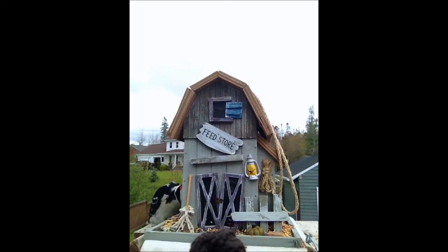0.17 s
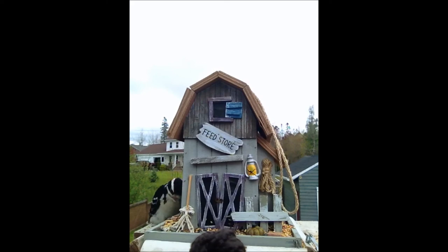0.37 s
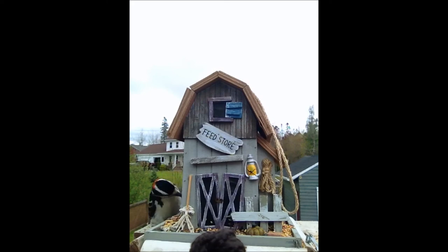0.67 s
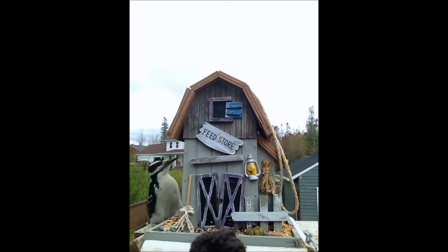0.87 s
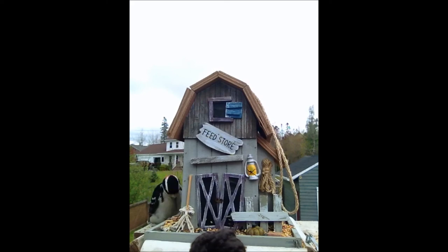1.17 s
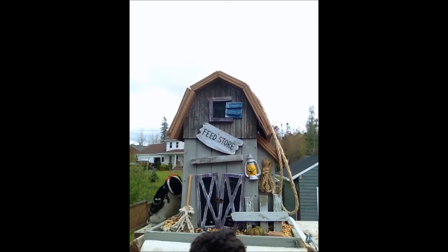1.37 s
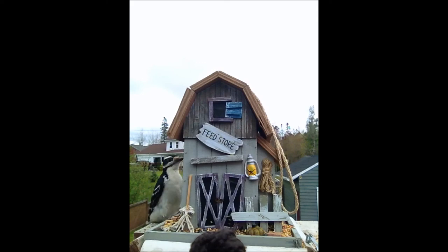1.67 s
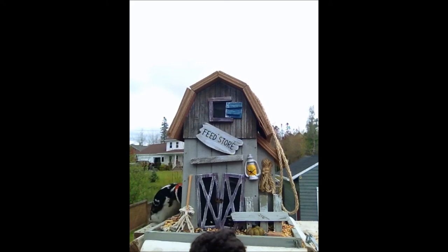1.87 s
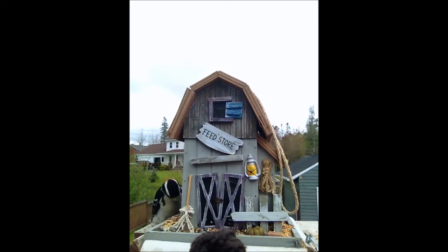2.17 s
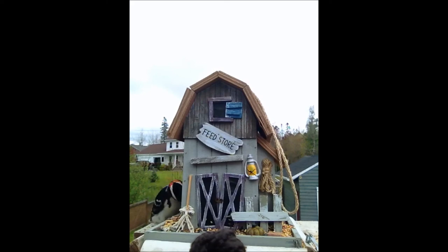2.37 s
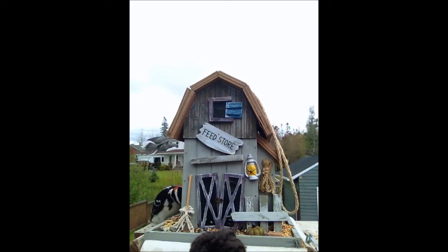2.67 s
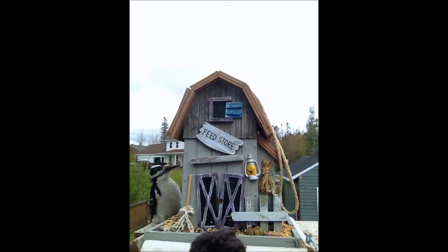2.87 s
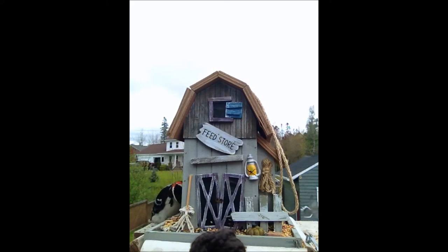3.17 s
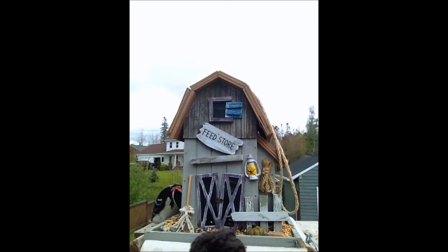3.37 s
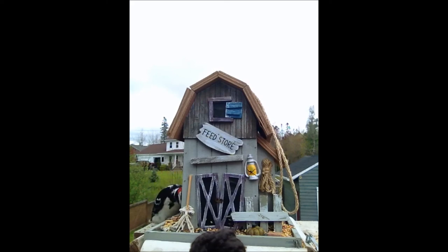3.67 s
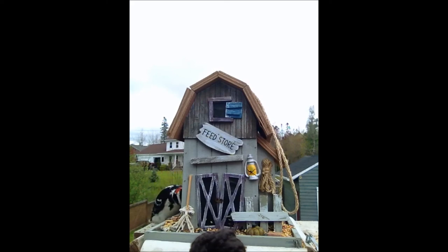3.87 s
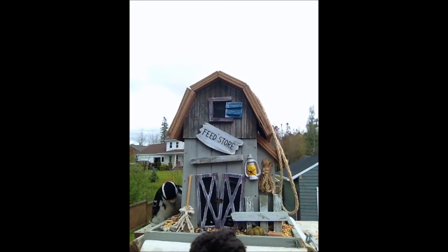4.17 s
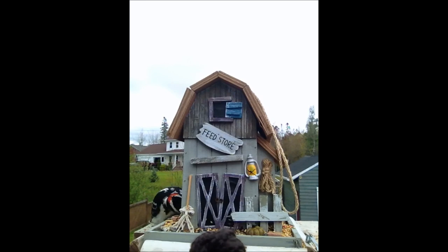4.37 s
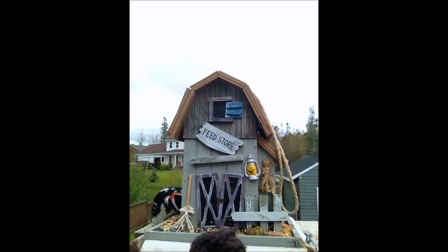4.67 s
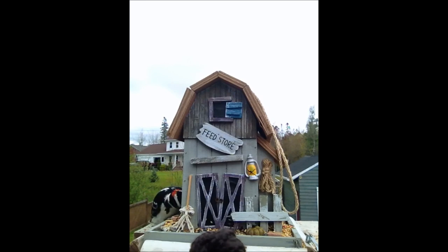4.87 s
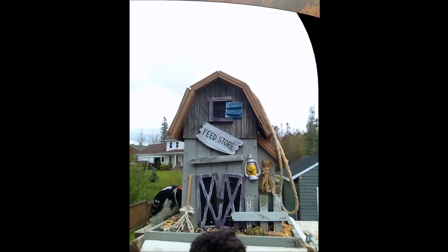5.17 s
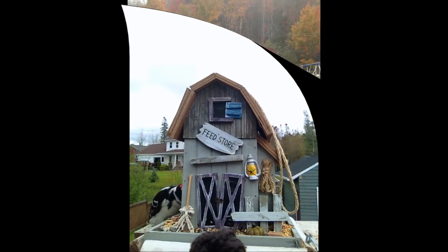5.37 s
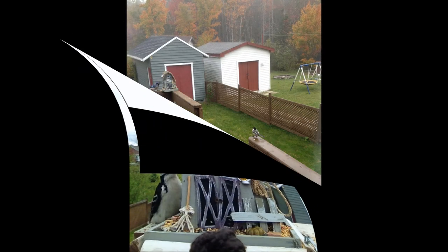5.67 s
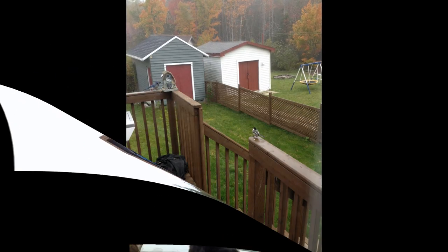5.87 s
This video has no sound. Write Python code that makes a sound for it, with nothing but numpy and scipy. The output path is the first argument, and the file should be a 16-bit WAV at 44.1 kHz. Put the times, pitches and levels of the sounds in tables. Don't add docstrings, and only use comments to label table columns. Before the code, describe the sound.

In an open backyard, close to the microphone, doves take off after a brief quiet hiss. Quick, breathy flaps carry short, reedy wing whistles, strongest around one second, then pass by and thin out. A woodpecker's five crisp pecks crack on shell and wood during the last flaps and just after. Faint far wing whistles and tiny seed ticks remain over soft, steady traffic noise.

```python
import sys
import numpy as np
from scipy import signal
from scipy.fft import rfft, irfft
from scipy.io import wavfile
from scipy.ndimage import uniform_filter1d

SR = 44100
rng = np.random.default_rng(int(sys.argv[2]) if len(sys.argv) > 2 else 0)


def digitize_waveform(pressure):
    field = np.atleast_2d(pressure).T
    bounded = np.clip(field, -1, 1)
    quanta = np.round(bounded * 32767).astype(np.int16)
    wavfile.write(sys.argv[1], SR, quanta)


def voltage_ratio(level):
    return 10 ** (np.asarray(level, float) / 20)


N = 266319


def evened(x):
    return x / np.sqrt(np.mean(x ** 2) + 1e-20)


def read(points, hz):
    f, value = np.transpose(points)
    return np.interp(np.log(hz + 1), np.log(f + 1), value)


def add(mix, s, sound):
    part = mix[round(s * SR):][:len(sound)]
    part += sound[:len(part)]


def coloured(x, points):
    log_gain = np.log(voltage_ratio(read(points, abs(np.fft.fftfreq(4096, 1 / SR)))))
    taps = np.fft.ifft(np.exp(np.conj(signal.hilbert(log_gain)))).real[:2048]
    return signal.oaconvolve(x, taps)[:len(x)]


def ring(modes, detune):
    t = np.arange(4096) / SR
    out = 0
    for (hz, db, t60_s), d in zip(modes, detune):
        out = out + voltage_ratio(db - 60 * t / t60_s) * np.sin(2 * np.pi * hz * d * t)
    return out


def wander(length, size):
    once = uniform_filter1d(rng.standard_normal(length), size)
    return evened(uniform_filter1d(once, size))


OVERTONES_DB = [2, 3.5, 6, -1.5, -4.5, -5, -3]


def whistle(db, length_s, top_hz, end_hz, far_wing):
    u = np.arange(round(length_s * 1.2 * SR)) / (length_s * SR)
    rough = np.clip(1 - far_wing, .032, 1)
    hz = top_hz - (top_hz - end_hz) * np.clip((u - .25) / 0.726, 0, 2) ** 1.48
    arch = np.clip((db + 52) / 110 * length_s / .03, .02, .2)
    hz *= 1 - arch * (np.exp(-u / .12) + .25 * u ** 8)
    far_wing_db = min(-11 + 120 * rough, -3)
    out = 0
    for ratio, wing_db in ((1, 0), (far_wing, far_wing_db)):
        jitter = 1 + 0.37 * rough * wander(4096, size=30)[:len(u)]
        turns = np.cumsum(hz * ratio * jitter) / SR + rng.random()
        gust_db = 3.2 * wander(4096, size=70)[:len(u)]
        for k, overtone_db in enumerate(OVERTONES_DB, 1):
            fuzz = 2.6 * k * rough * wander(4096, size=14)
            flicker = (voltage_ratio(2.5 * wander(4096, size=60)) + fuzz)[:len(u)]
            dulling_db = 1.6 * (k - 1.5) * u ** 2
            level = voltage_ratio(wing_db + overtone_db + gust_db - dulling_db)
            out = out + level * flicker * np.sin(2 * np.pi * k * turns)
    edges = np.clip(u / .16, 0, 1) * np.clip((u[-1] - u) / .22, 0, 1)
    return voltage_ratio(db - 6.5) * out * edges * voltage_ratio(-4.5 * u)


# (time [s], whistle level [dB], length [s], top pitch [Hz])
LIFT_OFF = [(.632, -46, 0.0185, 2360)]
CLIMB = [(.791, -34.5, 0.013, 2080), (.799, -42, 0.028, 2180), (.875, -37.5, 0.02, 2487),
         (.887, -32.5, 0.013, 2090), (.954, -31.5, 0.027, 2440), (.957, -32.5, 0.025, 2256),
         (1.026, -32.5, 0.027, 2376), (1.028, -34, 0.025, 2190), (1.108, -33.5, 0.032, 2146),
         (1.246, -51, .038, 1986)]
FLY_PAST = [(1.353, -45.5, 0.029, 2143), (1.478, -36, 0.018, 2232), (1.487, -41, 0.024, 2134),
            (1.714, -52, 0.023, 1970), (1.805, -40.5, 0.017, 2070), (1.828, -52, 0.021, 2070),
            (1.89, -34.5, 0.018, 2242), (1.907, -41, .027, 2165), (1.984, -39, .032, 2140),
            (2.084, -40.5, 0.016, 2170), (2.103, -45, 0.023, 2090), (2.318, -51.5, 0.0069, 1970),
            (2.432, -41.5, 0.019, 2284), (2.46, -46.5, 0.016, 2150), (2.506, -40.5, 0.0255, 2290),
            (2.531, -37.5, 0.013, 2200), (2.54, -51, .02, 2150), (2.621, -52, 0.023, 1925)]
FAR_OFF = [(2.854, -48.5, 0.016, 1945), (3.066, -55, 0.017, 1935), (3.704, -57.5, .016, 1960),
           (4.093, -62, 0.018, 1910), (4.209, -51.5, .016, 1993), (4.302, -54.5, .022, 1960),
           (4.423, -56.5, .02, 1980), (4.533, -52, .013, 2135), (4.544, -48.5, 0.018, 2275)]
BRAKING = [(.695, -42.5, 0.011, 2245), (1.367, -46.5, 0.021, 2070), (1.699, -41, 0.016, 2106),
           (2.183, -42, .026, 2063), (2.448, -39, 0.012, 2010)]
# (strokes, pitch sag [Hz], pitch gap between wings [0-1], gap per dB below FIRM_DB [1/dB])
FLIGHTS = [
    (LIFT_OFF, 150, .2, 0),
    (CLIMB, 47, 0.0259, 0.0031),
    (FLY_PAST, 93, 0.014, 0.00304),
    (BRAKING, 180, .03, 0),
    (FAR_OFF, 65, 0.015, 0),
]
FIRM_DB = -38


def wing_whistles():
    out = np.zeros(N)
    for strokes, sag_hz, gap, gap_per_db in FLIGHTS:
        for s, db, length_s, top_hz in strokes:
            far_wing = 1 - gap - gap_per_db * max(FIRM_DB - db, 0)
            add(out, s - .002, whistle(db, length_s, top_hz, top_hz - sag_hz, far_wing))
    return out


# (time [s], level [dB])
PUFFS = [(.585, -50.5), (0.627, -46), (.66, -46), (.693, -38.5), (.755, -48.5), (0.782, -39.5), (.84, -43),
         (.878, -35.5), (.92, -58), (.9544, -40), (.985, -36), (1.016, -39), (1.108, -59), (1.1494, -60),
         (1.2656, -51), (1.35, -46), (1.471, -43.5), (1.5484, -55), (1.588, -50.5), (1.69, -47), (1.8, -45),
         (1.8895, -41.5), (1.9884, -51), (2.078, -44), (2.178, -48.5), (2.304, -51), (2.434, -45),
         (2.515, -40.5), (3.6294, -58)]
# (frequency [Hz], level [dB])
PUFF_COLOUR = [(300, -26), (1000, -6), (2500, -12), (6000, 1.5), (10000, -5), (15000, 10)]
PUFF_S = 0.032
RUSTLE_DB, RUSTLE_S = 0.5, 0.077


def wing_puffs():
    push = np.zeros(N)
    u = np.arange(round(3 * PUFF_S * SR)) / (PUFF_S * SR)
    swell = (u / 0.35 * np.exp(1 - u / 0.18)) ** 2
    for s, db in PUFFS:
        add(push, s - .008, voltage_ratio(db - 3.0) ** 2 * swell)
    keep = np.exp(-1 / (RUSTLE_S * SR))
    push = push + voltage_ratio(RUSTLE_DB) ** 2 * signal.lfilter([1 - keep], [1, -keep], push)
    air = evened(coloured(rng.standard_normal(N), PUFF_COLOUR)) * voltage_ratio(1.1 * wander(N, size=50))
    return voltage_ratio(17.0) * np.sqrt(push) * air


# (time [s], beak crack [dB], shell ring [dB], board [dB], low thud [dB])
PECKS = [(2.387, -14, -27, -28.5, -60), (2.388, -25, -39, -26.5, -55), (2.5141, -12.5, -22, -24.5, -63),
         (2.516, -28, -38, -21, -38), (2.7043, -13.5, -16.5, -32, -39), (2.708, -28, -37, -25.5, -46),
         (2.7084, -22.5, -39, -38, -27), (2.7113, -36, -50, -27, -40), (3.1711, -18, -22, -29, -58),
         (3.173, -44, -30, -32, -57), (3.384, -24, -40, -26.5, -60), (3.3862, -18.5, -22, -34, -48),
         (3.3888, -19.5, -27, -23.5, -30.5)]
# (frequency [Hz], level [dB], t60 [s])
CRACK = [(4200, -2.5, 0.0076), (4670, 7, 0.0049), (5330, -2, 0.012), (5820, 7, 0.0044), (6350, -1, 0.0065)]
SHELL = [(3580, 8, 0.0089), (3160, -1, 0.0047)]
BOARD = [(760, -14, .022), (1030, -4.5, .022), (1290, -3, .02), (1500, -6, .016), (1750, -3, .024),
         (2200, -12, .014), (2650, -8, .014)]
THUD = [(245, 10.5, 0.022), (167, -11, 0.33), (315, -11, 0.072), (652, -1, 0.037), (820, 4, 0.028),
        (1000, 0.5, 0.028)]


def pecks():
    out, t = np.zeros(N), np.arange(4096) / SR
    bodies, rises_s = (CRACK, SHELL, BOARD, THUD), (.0003, .0005, .0009, .003)
    for s, *levels_db in PECKS:
        for modes, db, rise_s in zip(bodies, levels_db, rises_s):
            detune = rng.uniform(0.96, 1.03, 8)
            if modes is BOARD:
                detune *= rng.choice([-1, 1], 8)
            onset = 1 - np.exp(-(t / rise_s) ** 2)
            add(out, s, voltage_ratio(db - 1.5) * ring(modes, detune) * onset)
    return out


# (time [s], peak level [dB], centre [Hz], width [octaves])
CLAPS = [(.639, -43.5, 1340, 0.26), (.6965, -42, 4800, .6), (.843, -44.5, 4500, 0.58),
         (.942, -40, 5500, 1.1), (1.0137, -27, 5600, .35), (1.0141, -38.5, 1630, 1.2),
         (1.0135, -31, 10500, 0.35), (1.0945, -38, 5230, 0.66), (1.0965, -33.5, 6100, 0.98),
         (1.155, -47.5, 3580, .8), (1.176, -46, 6990, 1.5), (1.457, -49, 3950, 0.45),
         (1.878, -46, 7000, 1.3), (1.925, -43.5, 3500, 1.5), (1.97, -44, 6030, 1.1), (1.6, -49, 4500, 1.7),
         (2.001, -38.5, 4400, .49), (2.008, -41.5, 4400, 0.63), (2.496, -39, 8920, 1.8)]
SHELLS = [(3.766, -53, 4500, 1.1), (3.807, -44, 8000, 2.9), (3.977, -24.5, 13000, 0.98),
          (3.9772, -30.5, 4000, .7), (3.994, -49, 11000, .96), (4.237, -50, 14000, .1),
          (4.69, -58, 7000, .8), (4.78, -44, 12000, 1.1), (4.793, -51.5, 6000, .6),
          (4.88, -44.5, 6900, 0.66), (4.954, -42, 8350, 1.2), (5.013, -45, 1440, 0.43),
          (5.014, -41.5, 3230, 0.85), (5.088, -52, 3500, .7), (5.09, -43, 1290, .4),
          (5.115, -43, 3700, .86), (5.343, -41.5, 4200, 0.99), (5.345, -46, 3600, 1.1),
          (5.347, -52, 2550, 0.25)]
SPLINTERS = [(2.387, -49, 12700, 0.41), (2.709, -44, 10900, 0.5), (3.173, -38.5, 11000, 0.99),
             (3.387, -39, 10000, .84)]
CLAP_S, SHELL_S, SPLINTER_S = 0.004, .0017, 0.0038
HARDEN = .45


def ticks():
    out, hz = np.zeros(N), np.fft.rfftfreq(1024, 1 / SR)
    for rows, soft_s in ((CLAPS, CLAP_S), (SHELLS, SHELL_S), (SPLINTERS, SPLINTER_S)):
        for s, db, centre_hz, octaves in rows:
            length_s = soft_s * voltage_ratio(-HARDEN * (db + 47))
            u = np.arange(1024) / (length_s * SR)
            shape = u * np.exp(1 - u)
            z = rfft(rng.standard_normal(1024) * shape ** 2)
            band = np.exp(-(np.log2(hz / centre_hz + 1e-3) / octaves) ** 2)
            burst = irfft(z / abs(z) * band) * shape
            add(out, s - length_s, voltage_ratio(db + 7.5) * burst / abs(burst).max())
    return out


# (time [s], level [dB])
WALLS = [(.005, -24), (0.0159, -21), (.026, -75)]


def yard(x):
    t = np.arange(12000) / SR
    tail = rng.standard_normal(len(t)) * voltage_ratio(-60 * t / 0.25) * np.clip((t - .004) / 0.0078, 0, 1)
    taps = voltage_ratio(-21.0) * tail / np.linalg.norm(tail)
    taps[0] = 1
    for s, db in WALLS:
        smear = rng.standard_normal(320) * np.hanning(320)
        add(taps, s, voltage_ratio(db) * smear / np.linalg.norm(smear))
    return signal.oaconvolve(x, taps)[:N]


# (frequency [Hz], level [dB])
MICROPHONE = [(30, -54), (130, -5), (2000, 2.5), (3200, -0.5), (4300, -0.5), (5200, 2.5), (6500, -10),
              (7600, -16.5), (9000, -13.5), (11500, -12), (15000, -26)]


def microphone(x):
    return coloured(x, MICROPHONE)


# (frequency [Hz], density [dB/Hz])
HISS = [(30, -52), (55, -42), (80, -17.5), (120, -6), (200, 0.5), (350, -4), (1000, -0.5), (1600, -5.5),
        (2500, -15.5), (4000, -22), (5200, -17.5), (6300, -29.5), (8500, -39.5), (13000, -35)]
# (time [s], level [dB])
HISS_LEVEL = [(0.0, -51.5), (.89, -48.5), (1.51, -50), (1.95, -49.5), (3.38, -49.3), (4.07, -51),
              (5.03, -48.5), (5.5, -50), (6.04, -48)]


def traffic_hiss():
    frames, hz = N // 512 + 5, np.fft.rfftfreq(2048, 1 / SR)
    a, b, patches = rng.standard_normal((frames, 1025, 3)).T
    patches = evened(uniform_filter1d(uniform_filter1d(patches, 24, 0), 8, 1))
    z = (a + 1j * b) * voltage_ratio(read(HISS, hz)[:, None] + 0.13 * patches)
    hiss = signal.istft(z, nperseg=2048, noverlap=1536)[1][:N]
    swell_db = np.interp(np.arange(N) / SR, *np.transpose(HISS_LEVEL))
    return evened(hiss) * voltage_ratio(swell_db + 0.5)


# (start [s], end [s], pitch [Hz], start level [dB], end level [dB])
DRONES = [(.15, 0.505, 201, -60.5, -59), (.55, 1.34, 199, -56, -57), (1.38, 1.6, 192, -66, -61),
          (.62, 1.21, 286, -65, -62), (1.8, 2.66, 195, -71, -58), (2.68, 3.12, 197, -59, -67),
          (.47, 1.877, 115.7, -62, -63), (1.0, 1.7, 88, -71, -75), (1.68, 2.64, 92.7, -62, -67.5),
          (2.82, 3.08, 101, -75, -74), (.95, 1.55, 262, -58, -63.5), (1.73, 2.15, 268, -54.5, -72),
          (4.5, 5.8, 107, -75.5, -65.5)]


def engine_drones():
    out = np.zeros(N)
    for start, end, line_hz, start_db, end_db in DRONES:
        n = len(out[:round((end - start) * SR)])
        drift, waver = wander(N, size=6000)[:n], wander(N, size=1500)[:n]
        turns = np.cumsum(line_hz * (1 + 0.0079 * drift)) / SR
        tone = np.sin(2 * np.pi * turns) * signal.windows.tukey(n, .25)
        add(out, start, tone * voltage_ratio(np.linspace(start_db, end_db, n) + 2.0 + 3.3 * waver))
    return out


# (time [s], level [dB], pitch [Hz], t60 [s])
THUMPS = [(0.287, -38, 130, 0.09), (0.501, -53, 100, 0.073), (1.489, -50, 181, .05),
          (2.792, -53.5, 110, 0.14), (4.037, -53.5, 141.5, 0.18)]


def far_knocks():
    out = np.zeros(N)
    onset = np.minimum(np.arange(4096) / SR / 0.0087, 1)
    for s, db, knock_hz, t60_s in THUMPS:
        add(out, s, voltage_ratio(db + 3) * ring([(knock_hz, 0, t60_s)], [1]) * onset)
    return out


BREEZE_DB, LULL_S, LULL_DB = -79.5, 2.6, -12


def breeze():
    lull_db = LULL_DB * np.clip((np.arange(N) / SR - LULL_S) / .3, 0, 1)
    rumble = coloured(rng.standard_normal(N), [(20, -17), (60, 8), (110, -24)])
    return voltage_ratio(BREEZE_DB + lull_db) * evened(rumble)


def scene():
    birds = wing_whistles() + wing_puffs() + pecks() + ticks()
    background = traffic_hiss() + engine_drones() + far_knocks() + breeze()
    return (microphone(yard(birds)) + background)[None]


def band_limit(x):
    return signal.sosfilt(signal.butter(12, 16380, fs=SR, output="sos"), x)


EDGE_HZ = 15470


def record(dry):
    lowpass = signal.firwin(1023, EDGE_HZ, window=("kaiser", 9), fs=SR)
    mix = signal.oaconvolve(dry, lowpass[None], "same")
    return band_limit(mix)


dry = scene()
out = record(dry)
digitize_waveform(out)
```